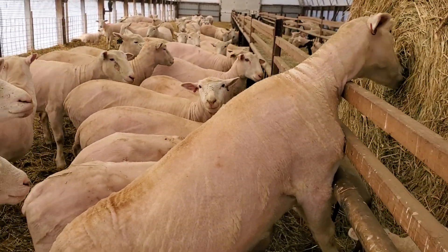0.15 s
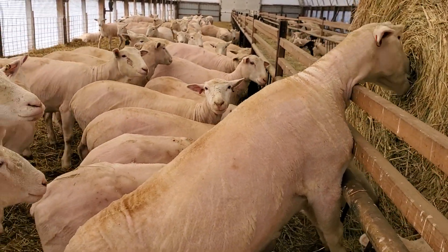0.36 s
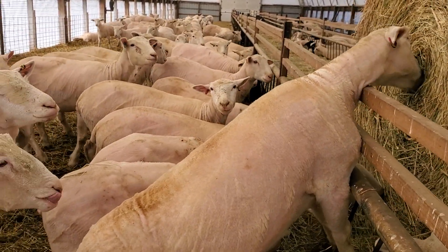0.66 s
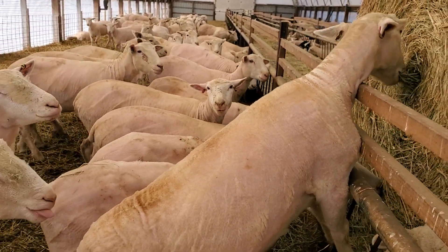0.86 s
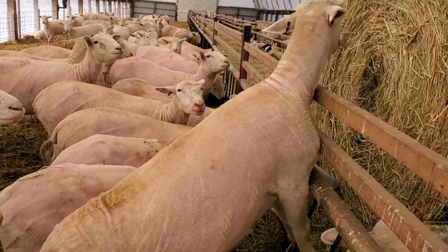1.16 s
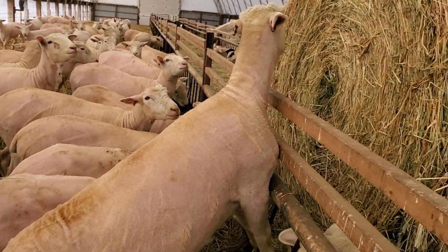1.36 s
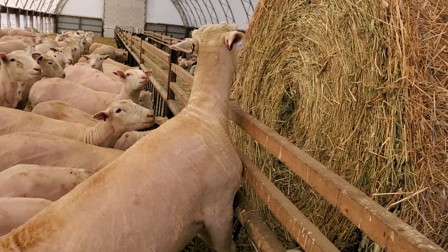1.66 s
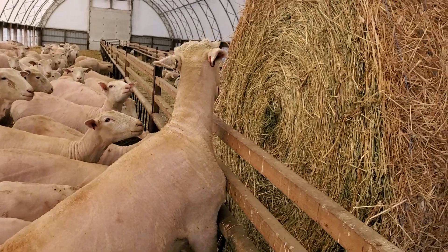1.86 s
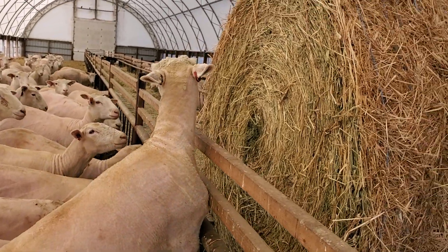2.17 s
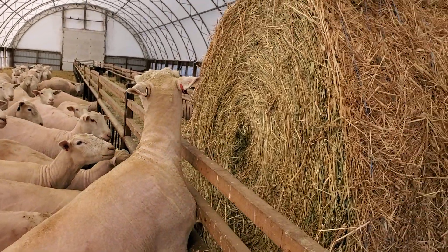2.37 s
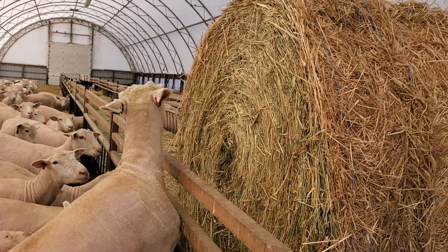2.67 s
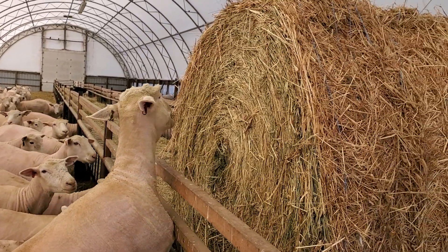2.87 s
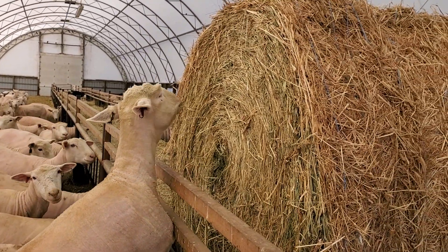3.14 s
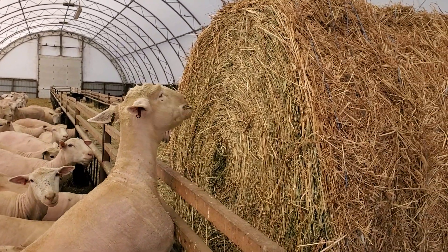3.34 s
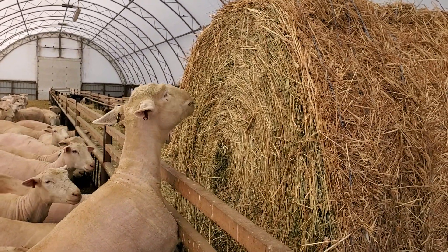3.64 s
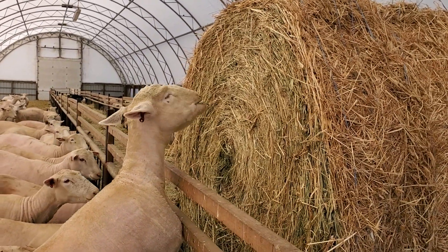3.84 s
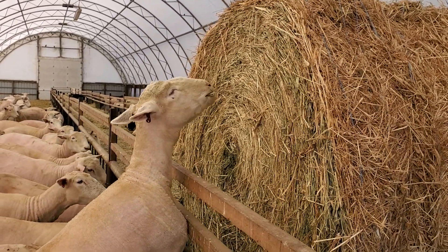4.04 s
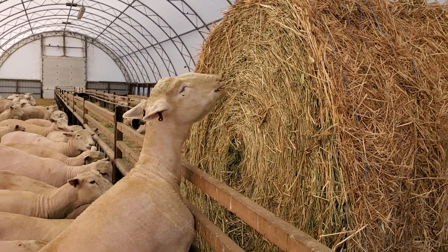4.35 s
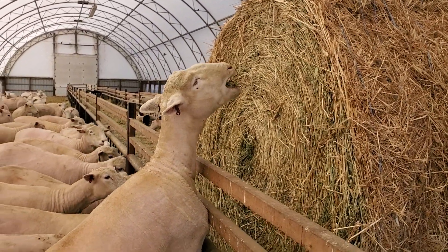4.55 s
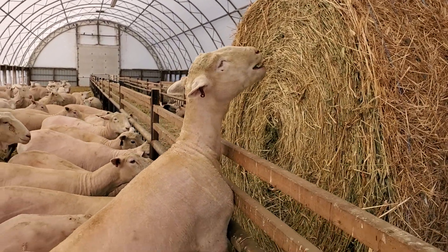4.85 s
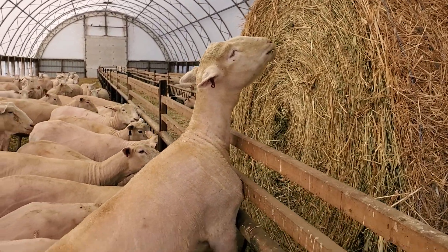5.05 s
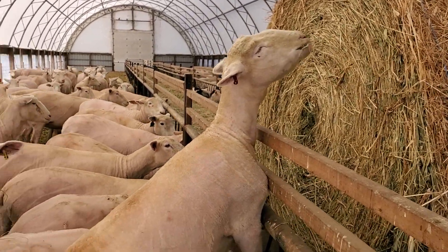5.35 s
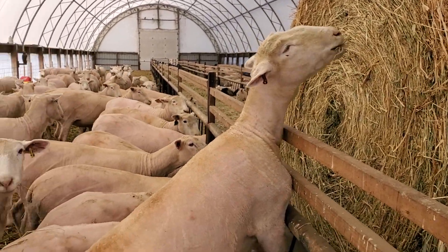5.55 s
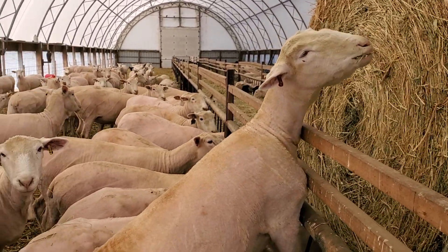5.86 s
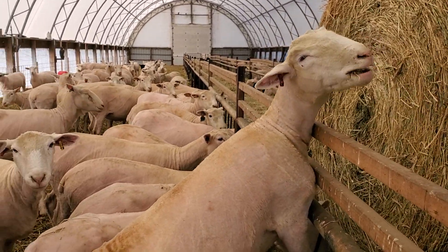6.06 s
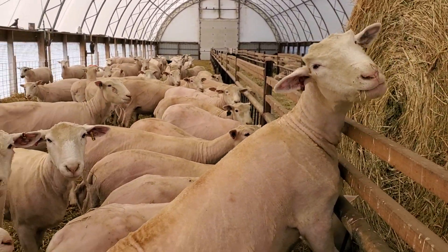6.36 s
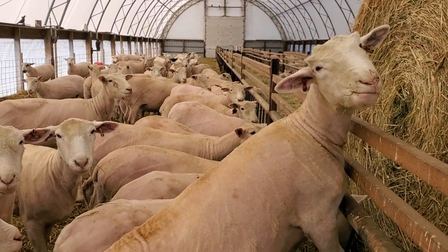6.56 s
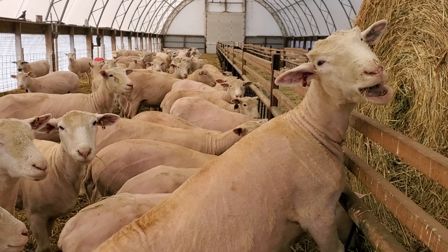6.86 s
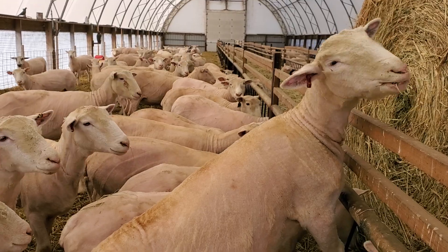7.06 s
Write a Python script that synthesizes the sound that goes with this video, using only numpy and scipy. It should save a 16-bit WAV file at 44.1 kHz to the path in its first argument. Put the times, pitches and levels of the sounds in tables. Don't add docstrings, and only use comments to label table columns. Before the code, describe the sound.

In a reverberant barn, two close sheep bleat in turn, one raspy and quivering, one long and steady, amid straw rustle and wooden knocks.

```python
import sys
import numpy as np
from scipy import signal
from scipy.fft import rfft, irfft, next_fast_len
from scipy.io import wavfile
from scipy.ndimage import uniform_filter1d, map_coordinates

SR = 44100
rng = np.random.default_rng(int(sys.argv[2]) if len(sys.argv) > 2 else 0)


def volts(x):
    e = np.asarray(x, float) / 20
    return 10 ** e


def transcribe(signal):
    frames = np.atleast_2d(signal).T
    limited = np.clip(frames, -1, 1)
    pcm = np.round(limited * 32767).astype(np.int16)
    wavfile.write(sys.argv[1], SR, pcm)


N = 317961

# start_s, pitch_hz, level_db
HOARSE_PITCH = [
    (.02, 158.5, -41.5),
    (.09, 175.9, -39),
    (.165, 193.5, -30),
    (.2, 186.4, -34),
    (.3, 183.5, -34),
    (.5, 180.6, -30.5),
    (.6, 182.9, -35),
    (.72, 176, -33),
    (.83, 187.6, -34),
]
# centre_s, level_db, length_s
BELLY_THROBS = [
    (0.207, -26, 0.063),
    (0.299, -23.5, 0.063),
    (0.399, -23.5, 0.064),
    (0.495, -24.5, 0.04),
    (0.587, -25.5, 0.0495),
    (0.682, -29, 0.0706),
    (0.772, -29, 0.065),
]
# start_s, level_db, mouth_opening (0-1)
CLEAR_EFFORT = [
    (3.222, -45, 0.99),
    (3.236, -29.5, 1),
    (3.28, -18, 1),
    (3.4, -16.5, 0.7),
    (3.5, -20.5, 0.11),
    (3.62, -22.5, 0.07),
    (4.225, -26, .1),
    (4.3, -32, 0.58),
    (4.33, -42, 0.7),
]
# start_s, pitch_hz
CLEAR_PITCH = [
    (3.2, 135),
    (3.24, 143.8),
    (3.3, 165.1),
    (3.36, 176.8),
    (3.4, 186.7),
    (3.6, 183.4),
    (4.205, 182.9),
    (4.235, 177.3),
    (4.315, 141.2),
]
# centre_s, added_breath (share), treble_lift_db, length_s
SHOUT_RASPS = [
    (3.228, 0.44, 12, .01),
    (3.348, 0.47, 12.5, 0.036),
]
# centre_s, lift_db
MIDDLE_BAND_SWELLS = [
    (3.45, 3),
    (3.67, -6.5),
    (4.07, -10),
    (4.15, -9),
    (4.22, 2),
]
# freq_hz, level_db
HOARSE_MOUTH_SHUT = [(90, -25), (180, 0), (370, -6), (550, 0.5), (730, -16), (900, -1.5), (1100, -15),
                     (1500, -12.5), (1900, -3), (2200, -12.5), (2430, -4), (2800, -46), (5000, -26),
                     (9000, -68)]
# freq_hz, level_db
HOARSE_MOUTH_OPEN = [(120, -12), (340, -22), (550, 0), (800, -17), (1200, -14), (1530, -1.5), (1720, -9),
                     (2080, 2), (2550, -10), (2900, -21.5), (3350, -18.5), (4100, -25.5), (4600, -30),
                     (9000, -51)]
# freq_hz, level_db
CLEAR_MOUTH_SHUT = [(120, -25), (365, -12.5), (550, -3.5), (730, 4), (1090, -23.5), (1280, -6.5),
                    (1460, 0.5), (1650, -22.5), (1830, -6), (2200, -31), (2450, -18), (2850, -36),
                    (3900, -39), (7000, -52)]
# freq_hz, level_db
CLEAR_MOUTH_OPEN = [(120, -18.5), (345, -12.5), (540, -7.5), (700, 7.5), (900, -11), (1050, -12),
                    (1250, -1), (1450, 6), (1750, -8.5), (1980, -1.5), (2550, -18), (2950, -17),
                    (5500, -37), (10000, -57.5)]
# freq_hz, level_db
SNORT_FLAPS = [(50, -29), (100, 3.5), (200, -1.0), (500, -4), (1100, -14), (2500, -28)]
SNORT_HISS = [(500, -20), (1000, 3.5), (2500, 0.5), (4000, -4.5), (7000, -10), (15000, -42)]
# start_s, peak_db, pitch_hz, t60_s
RAIL_KNOCKS = [(1.115, -42, 600, 0.026), (1.241, -42, 226, 0.023), (1.409, -45, 208, 0.04),
               (1.626, -37, 292, 0.016), (1.898, -47, 245, 0.016), (2.91, -43, 613, 0.069),
               (2.952, -23, 342, 0.0098), (3.805, -34, 3450, 0.035), (4.408, -35, 255, 0.029),
               (4.9, -40, 1000, 0.019), (4.441, -35, 230, 0.023), (5.168, -42.5, 297, 0.03),
               (5.289, -39.5, 270, 0.031), (5.654, -38, 307, 0.037), (6.007, -38, 268, 0.025),
               (6.117, -32.5, 387, 0.025), (6.18, -41, 282, 0.031), (6.394, -27.5, 304, 0.014),
               (6.469, -29.5, 360, 0.025), (6.665, -39.5, 293, 0.05), (6.876, -34, 246, 0.034),
               (6.929, -40.5, 237, 0.066), (7.059, -45, 224, 0.04), (7.18, -39, 200, 0.055)]
# start_s, peak_db, left_minus_right_db
STRAW_SNAPS = [(0.8386, -16, 6), (1.0788, -22, 9), (1.237, -23, -12), (1.68, -16.5, 5), (1.899, -9.5, 7),
               (2.2627, -10, -1), (2.5272, -22, 2), (4.6553, -19, 3), (5.1667, -23, 10), (6.4074, -14, 4),
               (6.79, -17, -7), (7.154, -12, -1)]
# start_s, rumble_db
HOOF_ACTIVITY = [(0, -49), (.5, -58), (1, -67), (1.2, -51.5), (1.8, -60.5), (2.3, -53), (2.95, -50),
                 (3.39, -61), (4.3, -62), (4.78, -67), (5.4, -60.5), (5.94, -59.5), (6.1, -54.5),
                 (6.5, -54), (7.21, -46.5)]
# start_s, rustle_db
STRAW_ACTIVITY = [(0, -53), (.45, -54.5), (.9, -53.5), (1.16, -58), (1.72, -61.5), (1.95, -53.5),
                  (2.25, -52.5), (2.5, -57.5), (2.85, -52.5), (3.17, -55.5), (3.7, -56.5), (4.3, -58.5),
                  (4.75, -61), (5.2, -59), (5.5, -55.5), (6.5, -56), (6.9, -53), (7.21, -55)]
# centre_s, lift_db, length_s
LEG_SWISHES = [(.1, 2.5, .05), (.38, 4, .04), (.845, 3.5, 0.027), (1.0, 2, 0.089), (1.34, 7.5, 0.059),
               (1.63, 8.5, 0.12), (1.86, 2.5, 0.054), (2.07, 3, .05), (2.27, 8.5, 0.011), (2.61, 0.5, .04),
               (2.82, 4.5, 0.022), (3.01, 2, 0.085), (3.21, 3.5, 0.023), (3.43, 3.5, .04), (3.59, 1, 0.036),
               (3.91, 2, 0.1), (4.16, 2.5, 0.037), (4.36, 4, 0.062), (4.87, 4.5, 0.075), (5.42, 3, 0.067),
               (6.24, 6.5, 0.076), (6.41, 6, 0.077), (6.83, 2.5, .06), (6.95, 3.5, .03), (7.18, 7, 0.087)]
# freq_hz, level_db (per Hz)
RUMBLE_SPECTRUM = [(12, -64), (22, -40), (42, -6), (75, 3.5), (95, -0.5), (150, -9), (220, -17), (290, -32),
                   (480, -120)]
# freq_hz, level_db (per Hz)
SHUFFLE_SPECTRUM = [(76, 1), (130, 1.5), (150, 0), (284, 4), (557, -13.5), (1060, -63), (2200, -40),
                    (2860, -59), (4840, -120)]
# freq_hz, level_db (per Hz)
RUSTLE_SPECTRUM = [(710, 0.5), (1200, 0.5), (2130, -0.5), (2580, -4), (3080, -1.5), (4580, -3), (5610, -2),
                   (7290, -3.5), (9000, -7), (11700, -29), (19800, -120)]
# freq_hz, level_db (per Hz)
HISS_SPECTRUM = [(4410, -17), (7500, 0.5), (8100, -29), (9490, -5), (13100, 3), (15100, 6), (15800, 8),
                 (16200, -19)]
# freq_hz, correlation (0-1)
PORT_LIKENESS = [(25, .78), (60, .88), (150, .96), (500, .9), (1000, .6), (2500, .3), (6000, .1),
                 (15000, .03)]
# freq_hz, below_left_db
BODY_SHADE = [(150, -1), (400, 1.5), (700, 4.5), (1300, 12.5), (2400, 10.5), (4400, -3.5), (9000, 21)]
# freq_hz, t60_s
BARN_DECAY = [(150, 1), (700, 1), (2000, 0.77), (5000, 0.37), (12000, 0.067)]
# freq_hz, level_db
BARN_COLOUR = [(150, -9), (720, -19), (1000, -8), (1500, -5), (2500, 0), (6000, -0.5)]


def hoarse_bleat():
    jaw_drops_s, jaw_takes_s = .15, .0508
    breath_shut, breath_open, breath_grows_per_s = .17, .58, .15
    squeeze_clears = .45
    pitch_hz, db, on = curves(HOARSE_PITCH)
    t = np.arange(N) / SR
    opening = ramp(jaw_drops_s, jaw_takes_s)
    tiring = breath_grows_per_s * np.clip(t - jaw_drops_s, 0, 1)
    breath = breath_shut + opening * (breath_open - breath_shut + tiring)
    squeeze, throb = 0, 0
    for centre_s, level_db, length_s in BELLY_THROBS:
        phase = np.clip((t - centre_s) / length_s / 1.245, -.5, .5)
        shape = np.cos(np.pi * phase) ** 2.5
        squeeze = squeeze + shape
        throb = throb + volts(level_db) * shape
    breath = breath * (1 - squeeze_clears * squeeze)
    pitch_hz = pitch_hz * (1 + .06 * opening * (squeeze - .7))
    sound = voice(on, pitch_hz, opening, breath, HOARSE_MOUTH_SHUT, HOARSE_MOUTH_OPEN,
                  jitter=.12, scatter_db=2.5)
    return on * (volts(db) + 1.32 * throb) * sound


def clear_bleat():
    note_breath, shout_breath, break_breath = .015, .28, 1.2
    break_s, break_takes_s = 4.222, .035
    chest_s, chest_takes_s, chest_late_db = 3.235, .022, 8
    upper_from_s, upper_takes_s, upper_db = 3.75, .25, 11
    swell_s = .039
    pitch_hz, _ = curves(CLEAR_PITCH)
    db, opening, on = curves(CLEAR_EFFORT)
    breath = note_breath + shout_breath * opening ** 2 + break_breath * ramp(break_s, break_takes_s)
    breath = breath + bumps([(s, added, length) for s, added, _, length in SHOUT_RASPS])
    treble_db = bumps([(s, lift_db, length) for s, _, lift_db, length in SHOUT_RASPS])
    middle_db = bumps([(s, middle_lift_db, swell_s) for s, middle_lift_db in MIDDLE_BAND_SWELLS])
    upper_lift_db = upper_db * ramp(upper_from_s, upper_takes_s)
    chest_db = chest_late_db * (ramp(chest_s, chest_takes_s) - 1)
    sound = voice(on, pitch_hz, opening, .45 * breath, CLEAR_MOUTH_SHUT, CLEAR_MOUTH_OPEN,
                  jitter=.07, scatter_db=3)
    low, second, upper, treble = filtered(sound, lambda hz: np.array([
        1000. ** 6 / (hz ** 6 + 1000. ** 6),
        np.exp(-((hz - 1400) / 260) ** 4),
        1.5 * np.exp(-((hz - 3900) / 200) ** 2) + 2.5 * np.exp(-((hz - 5300) / 200) ** 2),
        hz ** 4 / (hz ** 4 + 3500. ** 4)]))
    shaped = (1 - np.clip(opening, 0, 1)) * volts(upper_lift_db) * upper
    shaped = shaped + (volts(middle_db) - 1) * second
    shaped = shaped + (volts(treble_db) - 1) * treble
    shaped = shaped + (volts(chest_db) - 1) * low
    return -on * volts(db) * (sound + shaped)


def voice(on, pitch_hz, opening, breath, shut, wide, jitter, scatter_db):
    turns = np.cumsum(pitch_hz * (1 + jitter * breath * wobble(130))) / SR
    harmonic = np.arange(1, 45)[:, None]
    span = slice(*np.flatnonzero(on)[[0, -1]])
    pulses = np.zeros(N)
    pulses[span] = np.cos(2 * np.pi * harmonic * turns[span]).sum(axis=0) / 5
    cycle_scatter = rng.standard_normal(N // 100)[np.round(turns).astype(int)]
    size = volts(min(scatter_db, 6) * breath * cycle_scatter)
    air = rng.standard_normal(N + 1)
    gate = (1 + np.cos(2 * np.pi * turns)) ** 2 / 2
    puff = (0.55 * air[1:] + 1.44 * np.diff(air)) * gate
    breath = np.clip(breath, 0, 1)
    folds = size * pulses * np.sqrt(1 - breath) + puff * np.sqrt(breath) * (on > 0)
    shut, wide = causal(folds, shut), causal(folds, wide)
    opening = np.clip(opening, 0, 1)
    return (1 - opening) * shut / shut[span].std() + opening * wide / wide[span].std()


def snort():
    start_s, level_db, hold_s, hiss_db = 2.286, -31, .029, -8
    rise_db_per_s, fall_db_per_s = 177, 153
    t = np.arange(N) / SR - start_s
    db = level_db + rise_db_per_s * np.minimum(t, 0) - fall_db_per_s * np.maximum(t - hold_s, 0)
    flutter = volts(2.1 * wobble(39.05))
    flaps = rush(SNORT_FLAPS, patchy_db=-1.0)
    hiss = rush(SNORT_HISS, patchy_db=-3.5)
    return volts(db) * unit(flutter) * (flaps + volts(hiss_db + 4.5) * hiss)


def knocks():
    out, t = np.zeros(N + SR), np.arange(SR // 8) / SR
    for start_s, peak_db, pitch_hz, t60_s in RAIL_KNOCKS:
        onset = 1 - np.exp(-t / 0.0022)
        ring = np.sin(2 * np.pi * pitch_hz * t) * volts(-60 * t / max(t60_s, .005)) * onset
        scuff = 0.17 * uniform_filter1d(rng.standard_normal(len(t)), size=8) * volts(-60 * t / 0.16)
        out[round(start_s * SR):][:len(t)] += volts(peak_db + 5.5) * (ring + scuff)
    return out[:N]


def snaps():
    out, t = np.zeros((2, N + SR)), np.arange(SR // 20) / SR
    for start_s, peak_db, pan_db in STRAW_SNAPS:
        burst = np.diff(rng.standard_normal((2, len(t) + 1))) * volts(-60 * t / 0.013)
        side_db = np.array([[.5], [-.5]]) * pan_db
        out[:, round(start_s * SR):][:, :len(t)] += volts(peak_db - 18.0 + side_db) * burst
    return out[:, :N]


def flock():
    hiss_over_db, shuffle_mean_db, shuffle_follows, swish_in_rustle = 6, -56, .77, .34
    straw_left_db, turns_s, turns_db = 4, 6.1, .5
    rumble_db, _ = curves(HOOF_ACTIVITY)
    busy_db, _ = curves(STRAW_ACTIVITY)
    swish_db = bumps(LEG_SWISHES)
    shuffle_db = shuffle_mean_db + shuffle_follows * (busy_db - busy_db.mean())
    rustle_db = busy_db + swish_in_rustle * swish_db
    hiss_db = busy_db + hiss_over_db + swish_db
    left_db = straw_left_db - turns_db * ramp(turns_s, 1)
    sides = volts(np.array([left_db, -left_db]) / 2)
    stir = 1.9 * wobble(9) + 0.56 * wobble(30)
    rumble = volts(rumble_db + 5.5 + 2.2 * wobble(6.1)) * rush(RUMBLE_SPECTRUM, patchy_db=2.0)
    shuffle = volts(shuffle_db + .7 * stir + 1.2 * wobble(20)) * rush(SHUFFLE_SPECTRUM, patchy_db=2)
    rustle = volts(rustle_db + 9.0 + 0.42 * stir) * sides * rush(RUSTLE_SPECTRUM, patchy_db=1.5)
    hiss = volts(hiss_db + 4.0 + 0.95 * stir) * sides * rush(HISS_SPECTRUM, patchy_db=1.1)
    return rumble + shuffle + rustle + hiss


def rush(spectrum, patchy_db, lag=15):
    z = signal.stft(rng.standard_normal((2, N)), nperseg=512)[2]
    field = uniform_filter1d(rng.standard_normal(z.shape[1:]), size=6, axis=0)
    field = uniform_filter1d(field, size=8, axis=1)
    pair = signal.istft(z * volts(patchy_db * unit(field)), nperseg=512)[1][:, :N]

    def mid_side(hz):
        turn = np.arccos(np.clip(along(PORT_LIKENESS, hz), -1, 1)) / 2
        return volts(along(spectrum, hz)) * [np.cos(turn), np.sin(turn)]

    mid, side = filtered(pair, mid_side)
    return unit(np.array([np.roll(mid + side, round(lag)), mid - side]))


def far_call():
    start_s, lasts_s, pitch_hz, level_db, fades_db = 2.68, .28, 2189, -60, 2
    db, on = curves([(start_s, level_db), (start_s + lasts_s, level_db - fades_db)])
    tone = np.sin(2 * np.pi * pitch_hz * np.arange(N) / SR)
    return on * volts(db + 1 + 4 * wobble(29.1)) * tone


def scattered(x, spread_s):
    knots = rng.random(200)

    def response(hz):
        delay_s = spread_s * np.interp(hz / 120, np.arange(200), knots) * hz ** 2 / (hz ** 2 + 900 ** 2)
        return np.exp(-2j * np.pi * np.cumsum(delay_s) * hz[1])

    return filtered(x, response)


def barn(x, delay_s, near_db):
    hz, t, z = signal.stft(rng.standard_normal((2, SR)), SR, nperseg=256)
    decay = volts(-60 * t / along(BARN_DECAY, hz)[:, None]) + volts(near_db - 60 * t / 0.11)
    tail = signal.istft(z * volts(along(BARN_COLOUR, hz))[:, None] * decay, SR, nperseg=256)[1]
    tail[1] = .5 * tail[0] + .5 * tail[1]
    late = np.pad(x, (round(delay_s * SR), 0))[None]
    return signal.fftconvolve(late, tail / np.sqrt(SR), axes=1)[:, :N]


def ports(x, lag):
    def response(hz):
        shade = volts(along(BODY_SHADE, hz) / 2)
        shift = np.exp(-1j * np.pi * hz * lag / SR)
        return np.array([shade * shift, 1 / (shade * shift)])

    return filtered(x, response)


def unit(x):
    return x / np.sqrt(np.mean(x ** 2) + 1e-20)


def along(points, hz):
    f, v = np.transpose(points)
    return np.interp(np.log(hz + 1), np.log(f + 1), v)


def curves(rows):
    s, *cols = np.transpose(rows)
    t = np.arange(N) / SR
    on = np.clip(np.minimum(t - s[0], s[-1] - t) / .01, 0, 1)
    return [np.interp(t, s, c) for c in cols] + [on]


def bumps(rows):
    t = np.arange(N) / SR
    return sum(height * np.exp(-((t - s) / max(length, .005)) ** 2) for s, height, length in rows)


def ramp(start_s, takes_s):
    return np.clip((np.arange(N) / SR - start_s) / takes_s, 0, 1)


def wobble(rate):
    knots = rng.standard_normal(int(N * 200 / SR) + 4)
    return map_coordinates(knots, [np.arange(N) * min(rate, 200) / SR])


def filtered(x, response):
    m = next_fast_len(N + 8192)
    return irfft(rfft(x, m) * response(np.fft.rfftfreq(m, 1 / SR)), m)[..., :N]


def causal(x, spectrum):
    gain = volts(along(spectrum, np.fft.rfftfreq(4096, 1 / SR)))
    cep = irfft(np.log(gain + 1e-5))
    cep[1:2048] *= 2
    cep[2049:] = 0
    return signal.fftconvolve(x, irfft(np.exp(rfft(cep))))[:N]


def scene():
    first = scattered(hoarse_bleat(), spread_s=0.00317)
    second = scattered(clear_bleat(), spread_s=.0035)
    voices = ports(first, lag=12.4) + ports(second, lag=-7.0)
    echo = barn(first, delay_s=.004, near_db=7.0) + barn(second, delay_s=.004, near_db=5.5)
    near = voices + volts(8.5) * echo + snort() + ports(knocks(), lag=7.5) + snaps()
    return near + flock() + ports(far_call(), lag=4.0)


def band_limit(x):
    return signal.sosfilt(signal.butter(12, 17100, fs=SR, output="sos"), x)


def record(dry):
    mix = filtered(dry, lambda hz: hz < 16000)
    return band_limit(mix)


dry = scene()
out = record(dry)
transcribe(out)
```